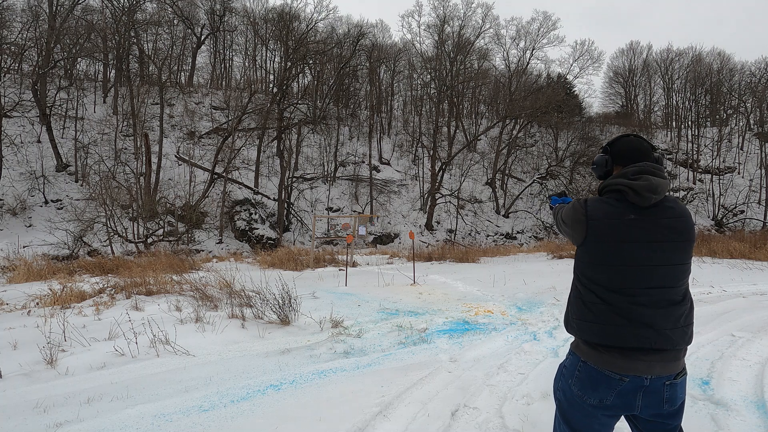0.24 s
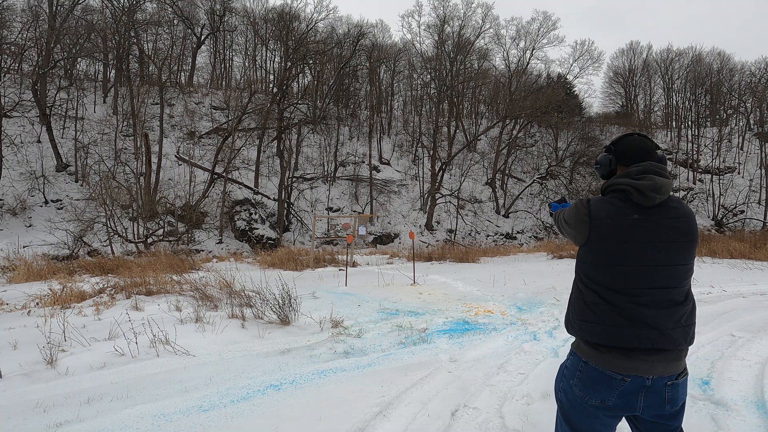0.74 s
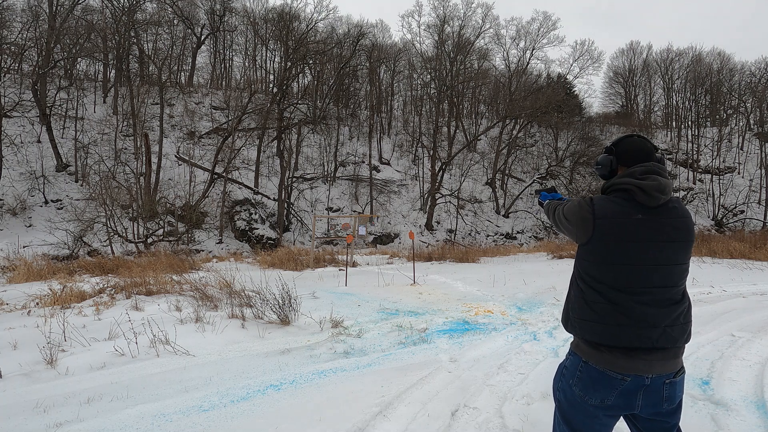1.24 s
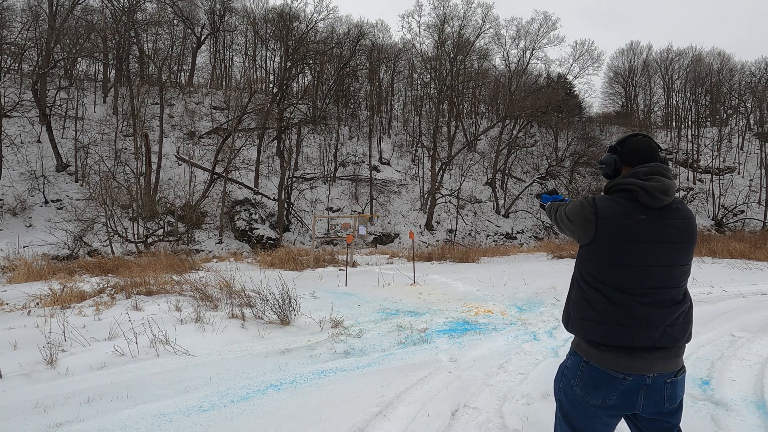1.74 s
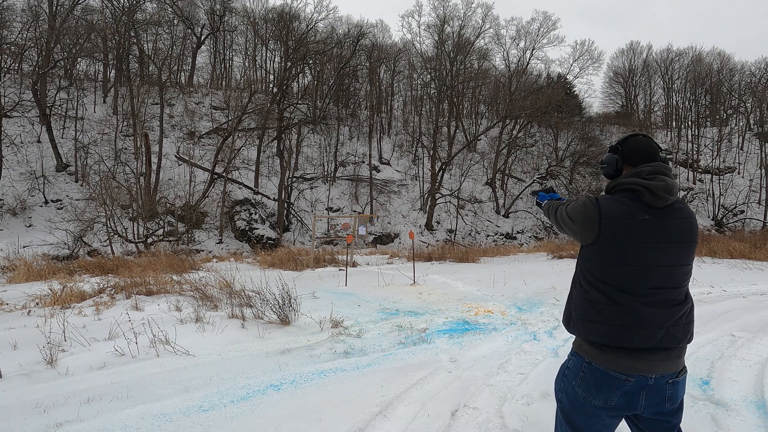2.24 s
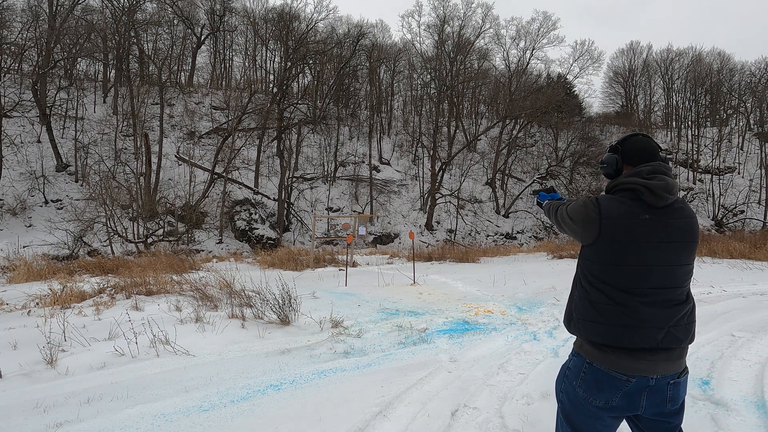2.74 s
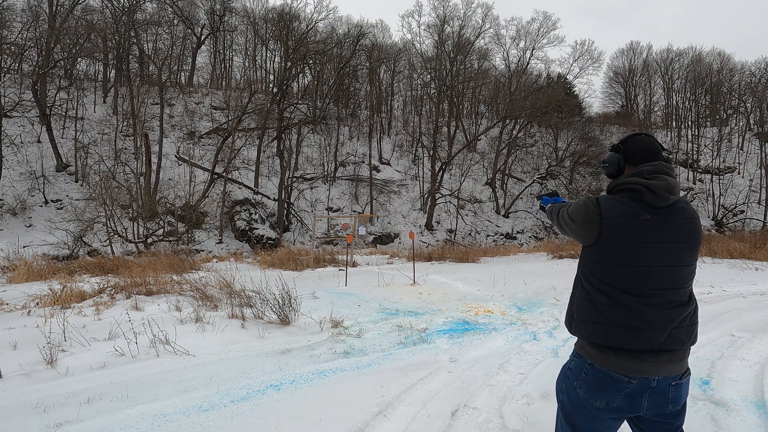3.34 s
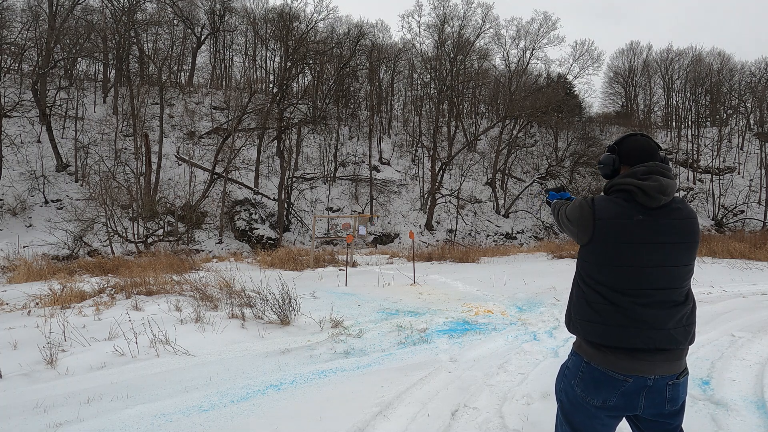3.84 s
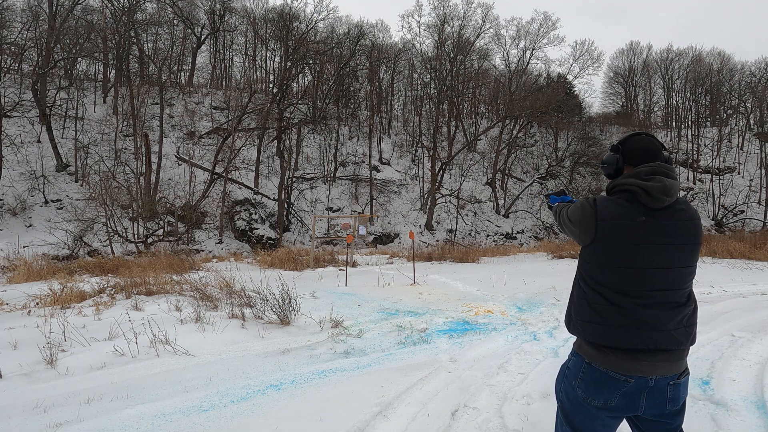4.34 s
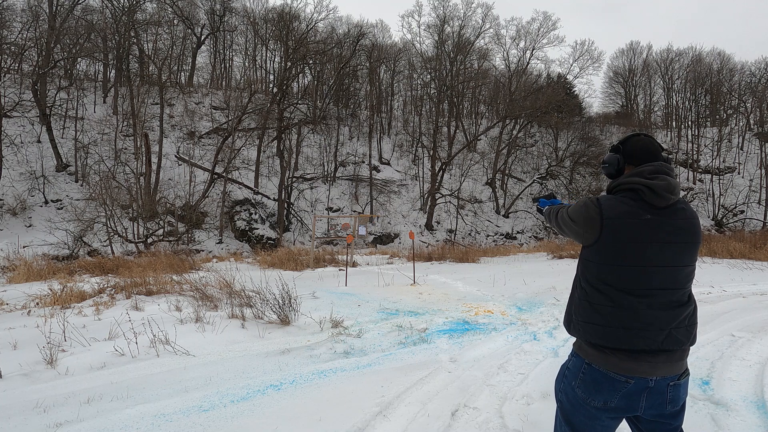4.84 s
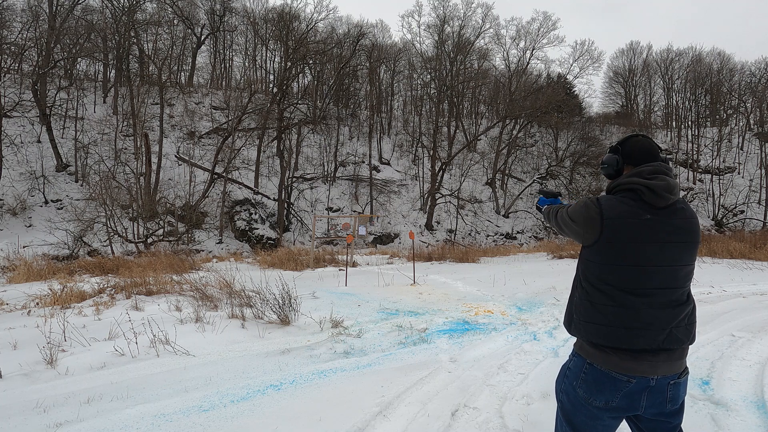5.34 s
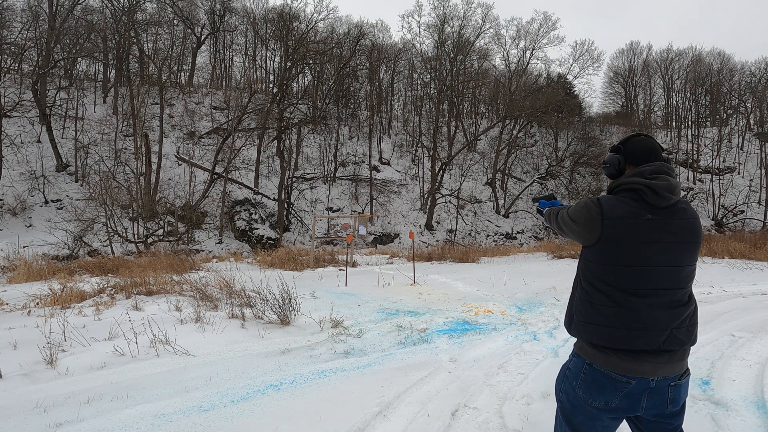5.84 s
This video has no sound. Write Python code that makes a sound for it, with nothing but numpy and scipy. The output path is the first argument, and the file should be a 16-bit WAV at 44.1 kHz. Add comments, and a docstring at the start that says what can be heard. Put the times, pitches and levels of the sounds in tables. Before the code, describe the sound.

Spaced handgun blasts heard from behind the shooter, each slapping back from wooded slopes, steel targets pinging briefly, low wind buffeting between.

```python
"""A snowy shooting range under a wooded hillside: five pistol shots heard from behind the shooter, while the
echo of an earlier one lingers. Noise and fading tones make each blast; banded noise swells up just ahead of it.
Steel plates ring as fading, fluttering tones. Short pulses slap back from nearby surfaces, and shaped noise
rolls back from the hillside, losing its treble. Slow noise makes the wind buffeting the microphone."""
import sys
import numpy as np
from scipy import signal
from scipy.fft import rfft, irfft, next_fast_len
from scipy.io import wavfile
from scipy.ndimage import uniform_filter1d, map_coordinates

SR = 44100
rng = np.random.default_rng(int(sys.argv[2]) if len(sys.argv) > 2 else 0)


def wav_record(signal):
    """Record a signal, one row per channel, as 16-bit PCM in the file named by sys.argv[1]."""
    frames = np.transpose(np.atleast_2d(signal))
    bounded = np.clip(frames, -1, 1)
    # unit amplitude maps onto the largest positive 16-bit level
    quanta = np.round(bounded * 32767).astype(np.int16)
    wavfile.write(sys.argv[1], SR, quanta)


def attenuation_scalar(level_db):
    """Turn a level in dB into a linear amplitude multiplier (20 dB per decade)."""
    decades = np.asarray(level_db, float) / 20
    return 10 ** decades


N = 267687

# In spectra (f/Hz, level/dB), the level is per Hz and only relative.
# Strength of the wind buffets over time: t/s, level/dB
BUFFETS = [(0, -58), (.3, -61), (.6, -53), (1.35, -58), (1.55, -60), (1.8, -54), (2.3, -59), (2.8, -79),
           (3.1, -49), (3.4, -49), (3.65, -72), (3.85, -58), (4.05, -74), (4.4, -51), (4.9, -56),
           (5.05, -45), (5.3, -47), (5.85, -64), (6.07, -54)]
# Spectrum of the slow wind rumble: f/Hz, level/dB
RUMBLE_COLOUR = [(15, -18), (30, 0), (55, -1), (85, -14), (150, -36), (300, -60), (600, -90)]
# Spectrum of the faster eddies in the gusts: f/Hz, level/dB
EDDY_COLOUR = [(50, -40), (90, 0), (150, -3), (260, -30), (600, -80)]
# Spectrum of the distant hush of the valley: f/Hz, level/dB
HUSH_COLOUR = [(71, -72), (140, -36), (292, -1), (569, -7), (1000, -4), (1300, -11), (2300, -26),
               (3800, -42), (8000, -62), (15000, -75)]

# Spectrum of the rolling hillside echo before the air dulls it: f/Hz, level/dB
HILL_COLOUR = [(70, -55), (150, -20), (231, -4.5), (292, -8.5), (420, -3), (614, 0), (850, -5), (1100, -9),
               (1630, -14.5), (2200, -16), (6430, -34), (14500, -60), (15600, -106)]
# Spectrum of the bright scatter off near snow and brush: f/Hz, level/dB
HAZE_COLOUR = [(300, -25), (1000, -4), (2500, 0), (8000, -15), (12000, -24), (15000, -48)]
# Treble lost on longer paths: f/Hz, loss/dB per s
AIR_LOSS = [(100, 20), (200, 6), (500, 0), (1500, 8), (2500, 11), (4000, 22), (8000, 50), (14000, 90)]
# Share of the echo's power that repeats from shot to shot: f/Hz, share/0-1
REPEATING_SHARE = [(300, .95), (1200, .6), (3000, .2)]
# Scattered returns of snow, field, stands, brush edge, hillside and valley, relative to the shot:
# t/s after the shot, level/dB, rise/s, t60/s (time to fall 60 dB)
ROLL_RETURNS = [(0, -26, .001, .25), (0, -41, .001, 1.5), (.086, -31, .006, .14), (.184, -37, .004, .3),
                (.199, -21.5, .007, 1.25), (.2, -30.5, .05, 4)]
# Bright returns of snow, brush edge and hillside, relative to the shot:
# t/s after the shot, level/dB, rise/s, t60/s
BRIGHT_RETURNS = [(0, -35, .001, .9), (.18, -38, .035, .9), (.17, -45, .02, 2)]
# Single reflections from stands, bank and trunks, relative to the shot: t/s after the shot, peak level/dB
REFLECTIONS = [(.045, -26), (.086, -12), (.088, -14), (.091, -15), (.186, -21), (.203, -12), (.216, -9),
               (.238, -14), (.261, -14), (.303, -17), (.325, -15)]
# Spectrum of one reflection: f/Hz, level/dB
REFLECTION_COLOUR = [(120, -36), (350, -7), (650, 0), (1500, -10), (3000, -22), (6000, -42), (12000, -75)]

# Ringing tones, one list for each plate and the hanger, before each blow's level and tilt:
# f/Hz, level/dB, t60/s before any choking
STEEL_MODES = [
    [(1195, -16, .6), (3440, 1.5, .17), (5459, -13, .75), (7133, -29, 1.5), (10010, -31, .12),
     (10590, -39, .3)],
    [(1114, -9, .8), (1755, -12, .12), (2864, -8, .08), (4334, -5, .55), (5809, -16, .1), (6412, -18, .1),
     (11260, -38, .4), (12740, -38, .2), (13750, -44, .3)],
    [(2256, -4, .5), (3009, -22, .5), (3208, -7, .55), (3817, -18, .9), (4021, -20, .2), (4635, -1, .6),
     (5259, -22, .6), (5701, -22, .7), (5997, -27, .6), (6772, -24, .3), (7510, -15, .4), (8425, -22, .6),
     (9103, -25, .2), (10700, -38, .5), (11140, -31, .6), (12900, -39, .6)],
    [(1803, 1.5, .13), (3569, -16, 1.1), (4544, -20, .8), (6196, -15, .75), (6535, -19, .75),
     (8570, -27, .7), (9652, -24, .8), (9835, -22, .2), (12950, -27, .5), (14050, -31, .6)],
    [(1733, -11, .35), (2396, -15, .4), (3440, -18, .3), (3887, 0, .2), (4603, -8, .7), (5335, -12, .4),
     (5400, -28, 1.3), (7483, -27, .9), (8301, -31, .8), (11090, -38, .3), (12700, -45, .9)],
    [(2234, -8, .1), (3020, 0, .14), (3833, -18, .2), (4667, -9, .22), (4823, -12, .12), (5717, -11, .16),
     (6020, -16, .1), (6794, -15, .14), (7542, -20, .22), (7752, -22, .09), (8460, -28, .16),
     (8899, -20, .12), (10900, -42, .1)],
]
# Row of STEEL_MODES that each blow lands on
STRUCK_ROWS = [0, 1, 2, 5, 5, 3, 5, 4]
# Blows on steel: t/s, ring level/dB, splash level/dB, tilt/dB per octave
STEEL_BLOWS = [(.527, -22, -20, 3), (1.696, -21, -10, 0), (3.079, -17, -9, 0), (3.545, -51, -46, 13),
               (3.709, -39, -36, -1.5), (4.33, -20, -9, -2), (4.875, -63, -62, 5), (5.482, -19, -20, 0)]
# Spectrum of the bullet breaking up, before each blow's tilt: f/Hz, level/dB
SPLASH_COLOUR = [(200, -30), (700, -8), (1800, 0), (4500, -7), (9000, -28), (15000, -56)]

# Shots, each with the noise swelling ahead of it; the first comes before the start, so only its echo is heard:
# t/s, blast and echo level/dB, noise level/dB before its swell, noise tilt/dB per octave
PISTOL_SHOTS = [(-1.05, 0, -14, 0), (.4805, 0, -13, 0), (1.612, -1, -12.5, -.5), (2.9945, 0, -15, -1),
                (4.2416, 0, -14.5, 0), (5.4377, 0, -15, 2.5)]
# Body of the blast, as the microphone housing rings with it, relative to the shot: f/Hz, level/dB, t60/s
BODY_MODES = [(240, -7, .075), (160, -8, .07), (640, -5, .04), (480, -13, .11), (730, -14, .08),
              (585, -14, .09), (1270, -18, .07), (1635, -18, .06), (2100, -18, .05), (2800, -19, .05),
              (42, -25, .15)]
# Spectrum of the muzzle crack before its tilt: f/Hz, level/dB
CRACK_COLOUR = [(180, -30), (300, 0), (893, -1), (2290, -18), (5320, -17), (6590, -27), (12600, -38),
                (15600, -57)]
# Spectrum of the noise ahead of each blast, before its tilt and random peaks: f/Hz, level/dB
LEAD_IN_COLOUR = [(80, -24), (150, -2), (600, -3), (1300, -14), (2100, -8), (4800, -9), (8800, -20),
                  (12000, -33), (15600, -58)]

# How far the two channels differ: f/Hz, side minus mid level/dB
CHANNEL_DIFFERENCE = [(60, -42), (200, -50), (1290, -44), (2380, -40), (4400, -30), (8120, -22),
                      (11000, -10), (15000, 6)]


def unit(x):
    """Scale to an average strength (rms) of 1."""
    return x / np.sqrt(np.mean(x ** 2) + 1e-20)


def along(points, hz):
    """Read a table of (f/Hz, value) at any frequency, on a log frequency axis."""
    f, value = np.transpose(points)
    return np.interp(np.log(hz + 1), np.log(f + 1), value)


def coloured(x, spectrum, tilt_db=0):
    """Filter x to a spectrum tilted about 2 kHz; the filter only reacts after each input sample."""
    size = 2 * next_fast_len(len(x) // 2 + 4096)
    hz = np.fft.rfftfreq(size, 1 / SR)
    gain = attenuation_scalar(along(spectrum, hz) + tilt_db * np.log2(hz / 2000 + .05))
    # folding the cepstrum (transform of the log gain) moves all the response after the input
    cepstrum = irfft(np.log(gain + 1e-6), size)
    cepstrum[1:size // 2] *= 2
    cepstrum[size // 2 + 1:] = 0
    return irfft(rfft(x, size) * np.exp(rfft(cepstrum)), size)[:len(x)]


def add(track, s, x):
    """Mix x into the track from time s, cutting what falls outside."""
    i = round(s * SR)
    x = x[max(-i, 0):N - i]
    track[max(i, 0):][:len(x)] += x


def wobble(rate, size):
    """A smooth random curve through rate knots a second."""
    knots = rng.standard_normal(1000)
    return map_coordinates(knots, [np.arange(size) * rate / SR], mode="mirror")


def valley_hush():
    """Steady distant noise whose level wanders gently."""
    noise = unit(coloured(rng.standard_normal(N), HUSH_COLOUR))
    return noise * attenuation_scalar(-53 + 1.5 * wobble(4, N))


def wind():
    """Lumpy low noise as the wind buffets, with faster eddies whose level swings wider."""
    t = np.arange(N) / SR
    s, buffet_db = np.transpose(BUFFETS)
    # eddies reach -66 dB when the buffet is at -55 dB, and change 1.7 dB for each buffet dB
    eddy_db = -66 + 1.7 * (buffet_db + 55)
    lumps = attenuation_scalar(3.8 * wobble(11, N))
    buffet = unit(coloured(rng.standard_normal(N), RUMBLE_COLOUR) * lumps)
    eddies = unit(coloured(rng.standard_normal(N), EDDY_COLOUR) * lumps)
    return attenuation_scalar(np.interp(t, s, buffet_db)) * buffet + attenuation_scalar(np.interp(t, s, eddy_db)) * eddies


def returns_db(rows, t):
    """Level of the summed power of returns that each rise and die away."""
    power = 0
    for s, db, rise, t60 in rows:
        late = np.maximum(t - s, 0)
        power = power + (attenuation_scalar(db - 60 * late / t60) * (1 - np.exp(-late / abs(rise)))) ** 2
    return 10 * np.log10(power + 1e-12)


def rolling_echo(land, clumps_db):
    """The same land answers each shot; moving air renews the treble, and far paths lose it."""
    n = len(land)
    fresh, bright = rng.standard_normal((2, n))
    sources = ((land, HILL_COLOUR), (fresh, HILL_COLOUR), (bright, HAZE_COLOUR))
    noises = np.array([unit(coloured(x, colour)) for x, colour in sources])
    hz, t, (repeated, renewed, haze) = signal.stft(noises, SR, nperseg=256)
    same = np.clip(along(REPEATING_SHARE, hz), 0, 1)[:, None]
    level_db = returns_db(ROLL_RETURNS, t) + same * np.interp(t, np.arange(n) / SR, clumps_db)
    roll = (np.sqrt(same) * repeated + np.sqrt(1 - same) * renewed) * attenuation_scalar(level_db)
    haze = haze * attenuation_scalar(returns_db(BRIGHT_RETURNS, t))
    loss = attenuation_scalar(-along(AIR_LOSS, hz)[:, None] * np.maximum(t - .25, 0))
    return signal.istft((roll + haze) * loss, SR, nperseg=256)[1][:n]


def slaps(n):
    """Single reflections: one short pulse, smeared by rough surfaces, repeated at each delay."""
    hits = np.zeros(n)
    for s, db in REFLECTIONS:
        hits[round(s * SR)] = attenuation_scalar(db)
    k = np.arange(1024)
    puff = rng.standard_normal(len(k)) * attenuation_scalar(-60 * k / SR / .007)
    pulse = coloured(puff + 1.5 * (k == 0), REFLECTION_COLOUR)
    return signal.fftconvolve(hits, pulse / np.abs(pulse).max())[:n]


def hillside_thud(n):
    """The low push comes back off the hillside as a fading 65 Hz tone."""
    late = np.maximum(np.arange(n) / SR - .2, 0)
    return attenuation_scalar(-36 - 60 * late / .2) * np.sin(2 * np.pi * 65 * late)


def echo(land, clumps_db):
    """All that comes back from the land after one shot."""
    n = len(land)
    return rolling_echo(land, clumps_db) + hillside_thud(n) + slaps(n)


def plate_ring(modes, tilt_db):
    """The swinging plate makes each tone flutter; its hanger chokes low tones most; an after-ring lingers."""
    t = np.arange(SR) / SR
    ring = np.zeros(SR)
    for hz, level_db, t60 in modes:
        choke_db = 70 * 4000 / hz * t ** 2  # 70 dB per s squared at 4000 Hz
        main = attenuation_scalar(-60 * t / t60 - choke_db)
        after = attenuation_scalar(-30 - 60 * t / t60 / 2.2)  # fades 2.2 times slower, unchoked
        flutter = attenuation_scalar(level_db + tilt_db * np.log2(hz / 3000) + 3.2 * wobble(30, SR))
        tone = np.sin(2 * np.pi * (hz * t + rng.random()) + .55 * wobble(45, SR))
        ring += (main + after) * flutter * tone
    return ring * (1 - np.exp(-t / .002))


def bullet_splash(tilt_db):
    """The bullet breaking up: noise with a quick fade and a weaker, slower one."""
    t = np.arange(SR) / SR
    noise = unit(coloured(rng.standard_normal(SR), SPLASH_COLOUR, tilt_db / 2))
    fade = attenuation_scalar(-60 * t / .02) + attenuation_scalar(-17 - 60 * t / .28)
    return noise * fade * (1 - np.exp(-t / .0015))


def steel():
    """Each blow splashes and sets its piece of steel ringing."""
    out = np.zeros(N)
    for (s, ring_db, splash_db, tilt_db), row in zip(STEEL_BLOWS, STRUCK_ROWS):
        ring = attenuation_scalar(ring_db) * plate_ring(STEEL_MODES[row], tilt_db)
        add(out, s, ring + attenuation_scalar(splash_db) * bullet_splash(tilt_db))
    return out


def lead_in(db, tilt_db):
    """Noise with a few narrow strong bands, swelling smoothly to full level at its end."""
    n = 2200  # samples, about 0.05 s
    bands = rfft(coloured(rng.standard_normal(n), LEAD_IN_COLOUR, tilt_db))
    peaks = attenuation_scalar(8 * unit(uniform_filter1d(rng.standard_normal(len(bands)), size=5)))
    swell = np.sin(np.minimum(np.linspace(0, 1.7, n), np.pi / 2)) ** 4
    return attenuation_scalar(db) * unit(irfft(bands * peaks, n)) * swell


def lead_ins():
    """Banded noise swells ahead of each blast and stops as the blast begins."""
    out = np.zeros(N)
    for s, _, noise_db, tilt_db in PISTOL_SHOTS:
        noise = lead_in(noise_db, tilt_db)
        add(out, s - len(noise) / SR, noise)
    return out


def blast():
    """Muzzle crack, a low push, and the tones it sets ringing in alternating senses."""
    t = np.arange(SR // 4) / SR
    late = np.maximum(t - .0006, 0)
    body = np.zeros(len(t))
    for k, (hz, db, t60) in enumerate(BODY_MODES):
        body += (-1) ** k * attenuation_scalar(db - 60 * late / t60) * np.sin(2 * np.pi * hz * late)
    body *= 1 - np.exp(-late / .0006)
    push = attenuation_scalar(-16) * (1 - t / .004) * np.exp(-t / .004)
    noise = unit(coloured(rng.standard_normal(len(t)), CRACK_COLOUR, 1.5))
    crack = noise * (attenuation_scalar(-5 - 60 * t / .015) + attenuation_scalar(-17 - 60 * t / .1))
    return body - push + crack


def pistol():
    """Blast and echo of every shot, over the same land."""
    out, n = np.zeros(N), 2 * SR
    land = rng.standard_normal(n)
    clumps_db = 3.3 * wobble(60, n)  # trunks return the sound in clumps
    for s, db, _, _ in PISTOL_SHOTS:
        add(out, s, attenuation_scalar(db) * blast())
        add(out, s, attenuation_scalar(db) * echo(land, clumps_db))
    return out


def scene():
    """All layers in two channels that differ slightly, most in the treble."""
    mid = valley_hush() + wind() + steel() + lead_ins() + pistol()
    hz, _, z = signal.stft(mid, SR, nperseg=512)
    difference = attenuation_scalar(along(CHANNEL_DIFFERENCE, hz))[:, None]
    side = signal.istft(z * difference * rng.standard_normal(z.shape), SR, nperseg=512)[1][:N]
    return np.array([mid + side, mid - side])


def low_pass(x):
    """Removes everything above the highest recorded frequency."""
    return signal.sosfilt(signal.butter(12, 15720, fs=SR, output="sos"), x)


def record(dry):
    """The input saturates on the blast: peaks bend smoothly towards a limit of 0.99."""
    mix = dry / (1 + np.abs(dry / .99) ** 8) ** (1 / 8)
    return low_pass(mix)


dry = scene()
out = record(dry)
wav_record(out)
```